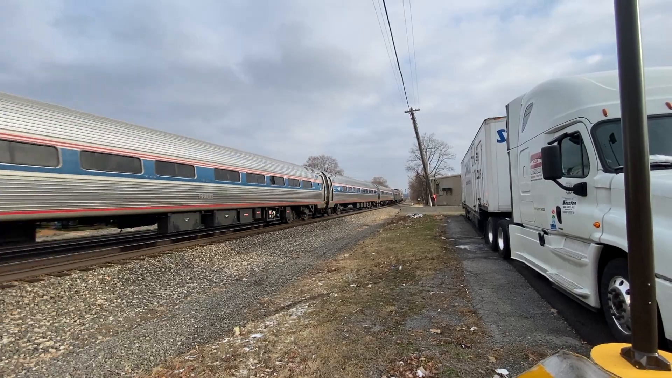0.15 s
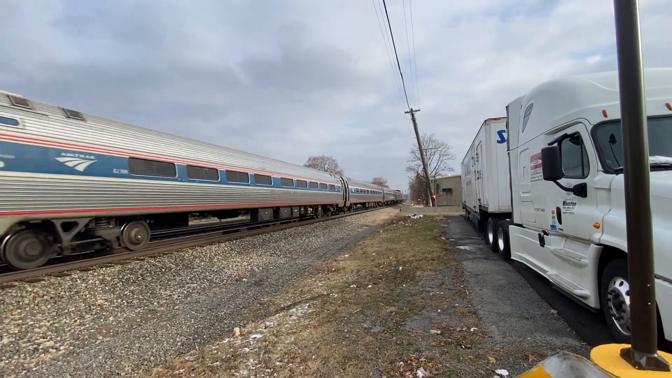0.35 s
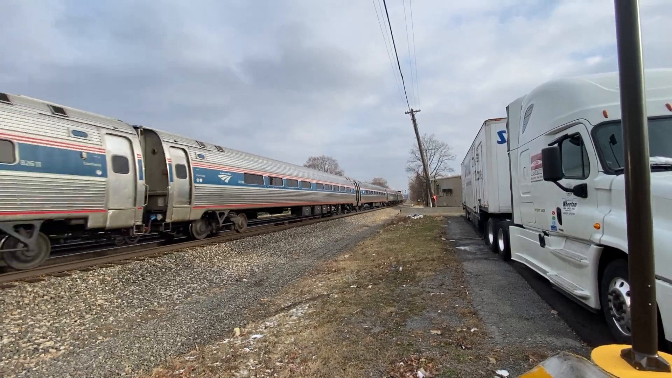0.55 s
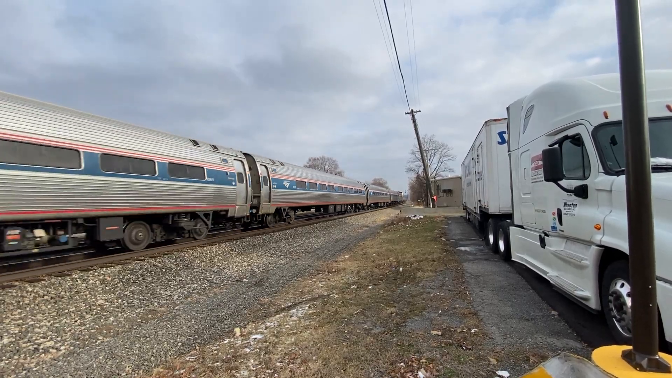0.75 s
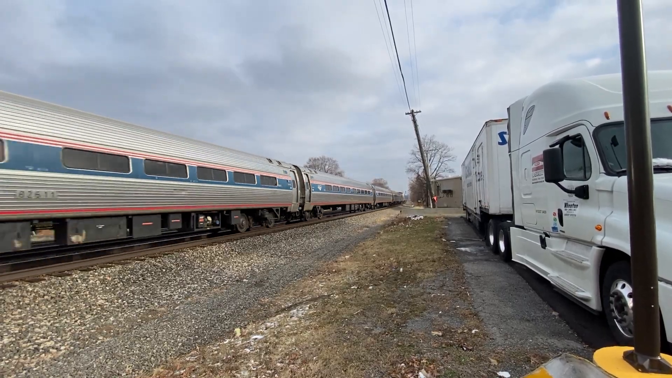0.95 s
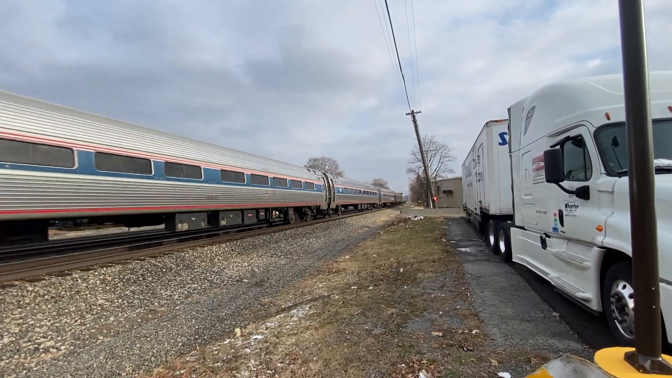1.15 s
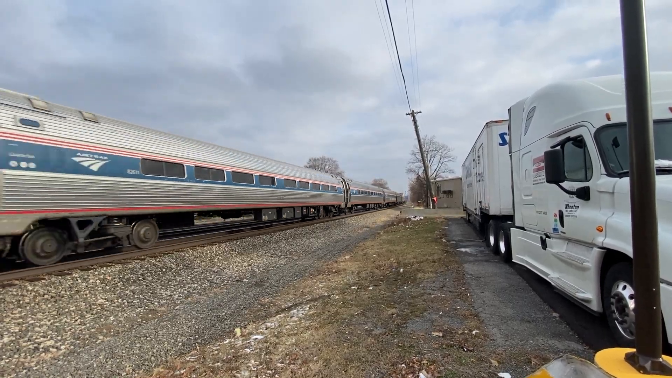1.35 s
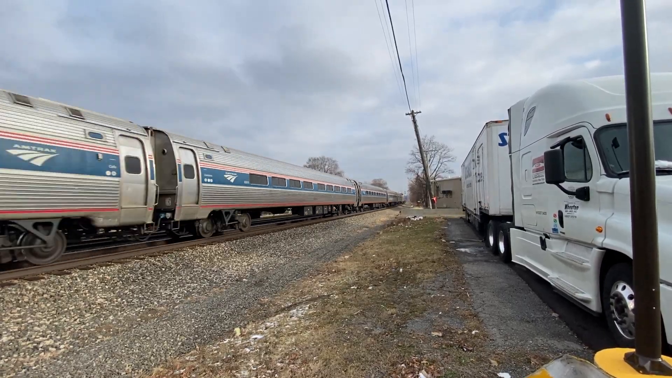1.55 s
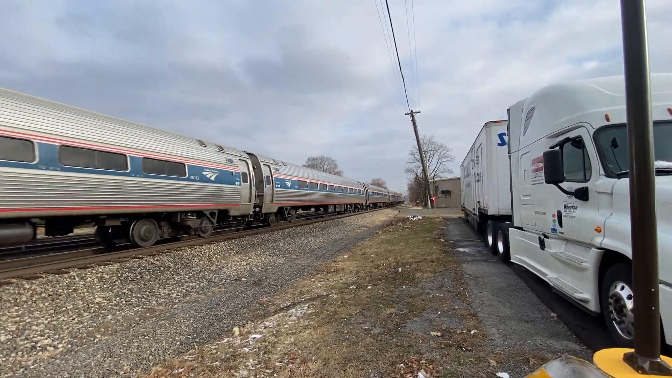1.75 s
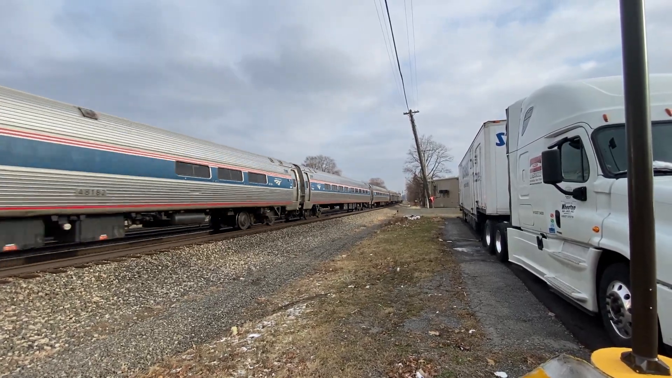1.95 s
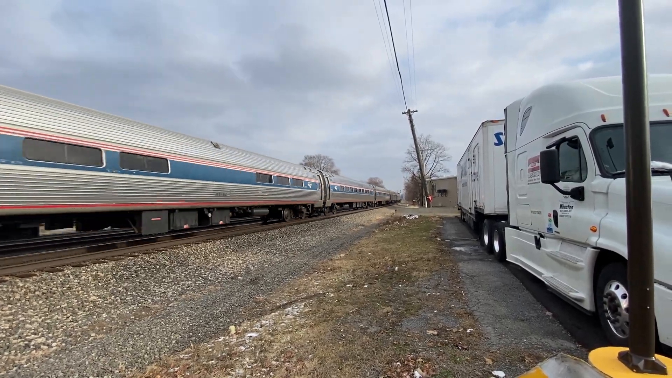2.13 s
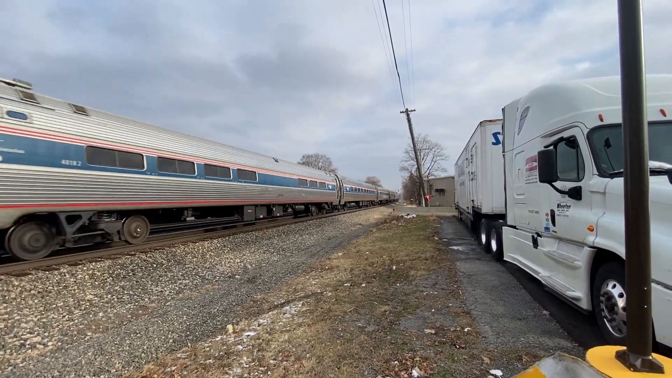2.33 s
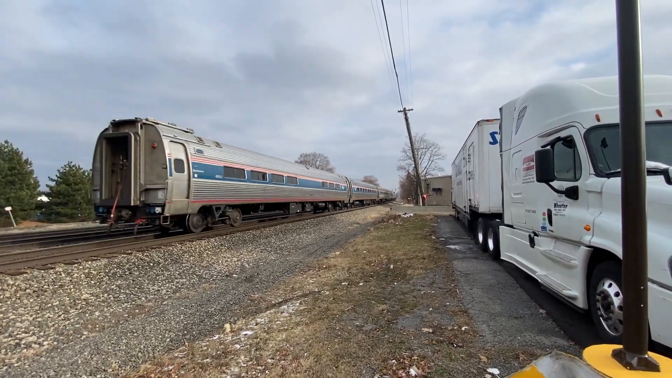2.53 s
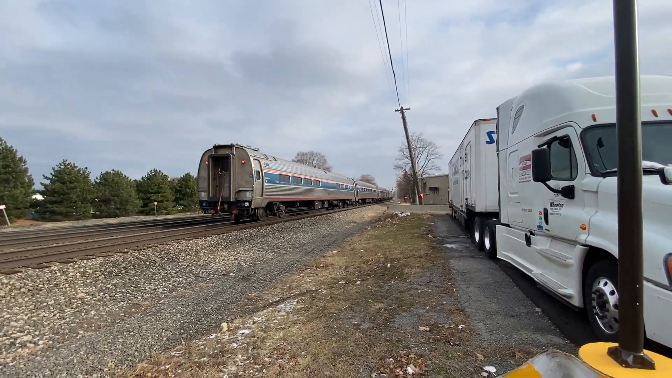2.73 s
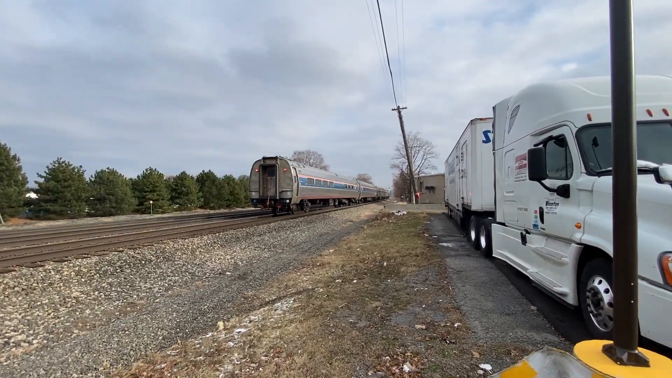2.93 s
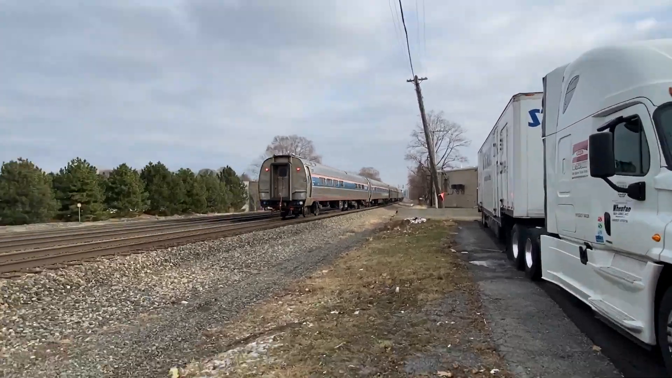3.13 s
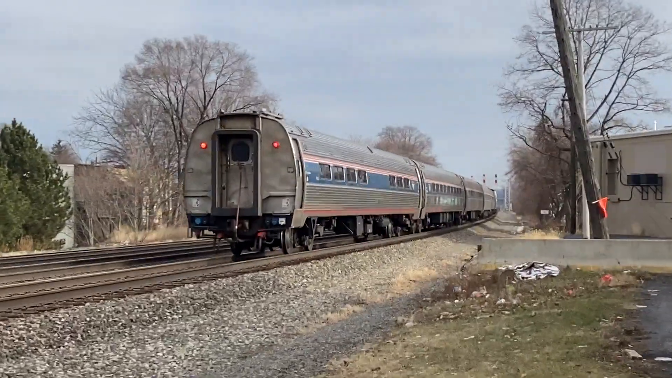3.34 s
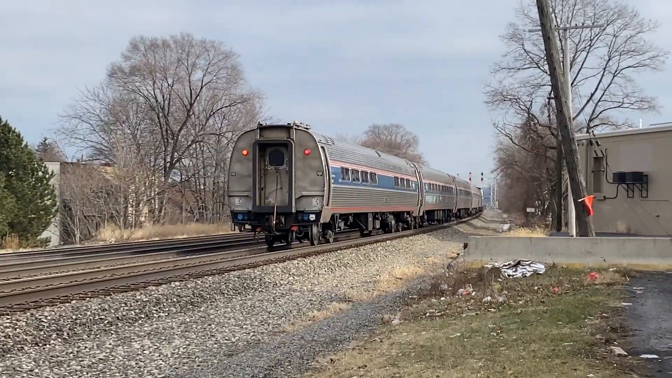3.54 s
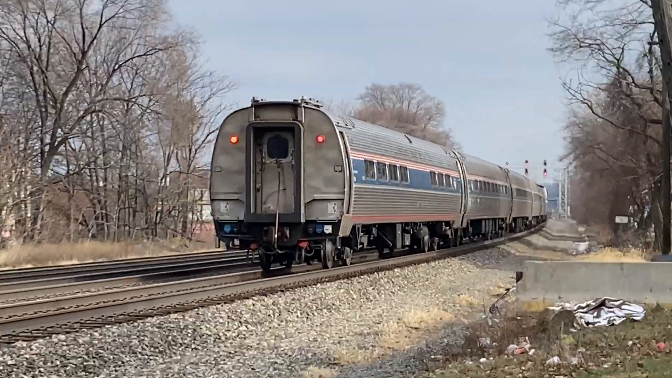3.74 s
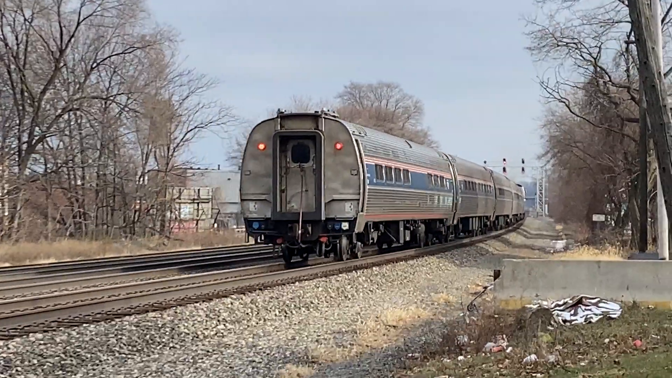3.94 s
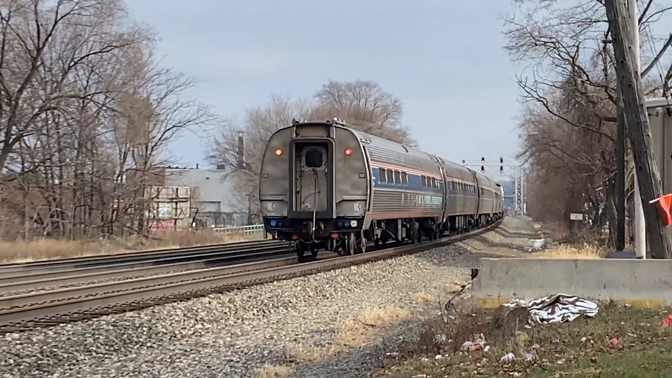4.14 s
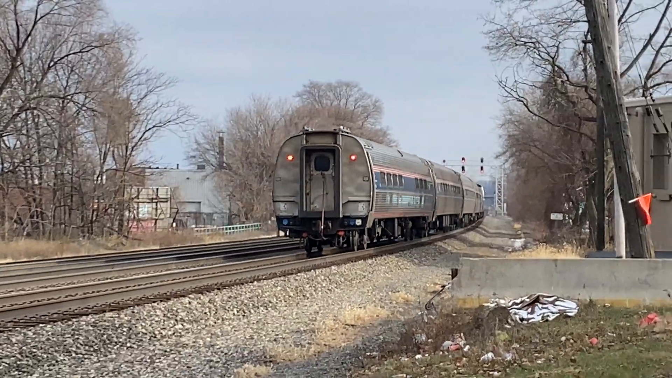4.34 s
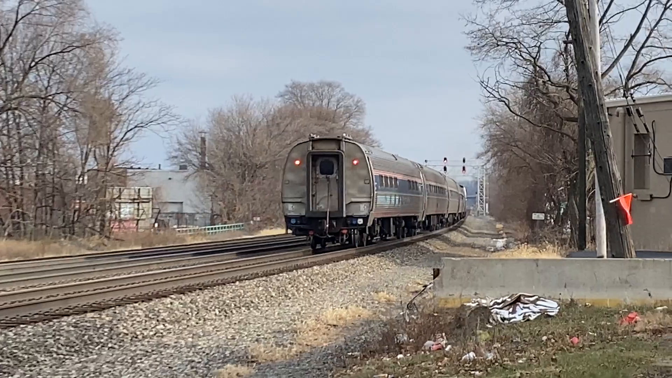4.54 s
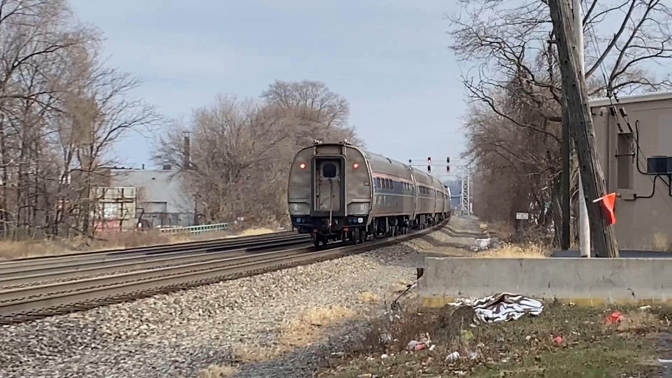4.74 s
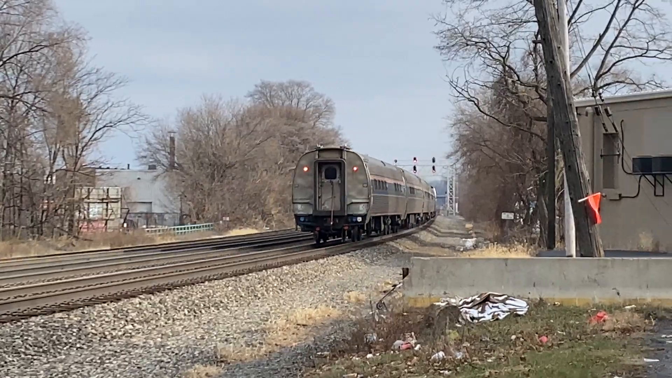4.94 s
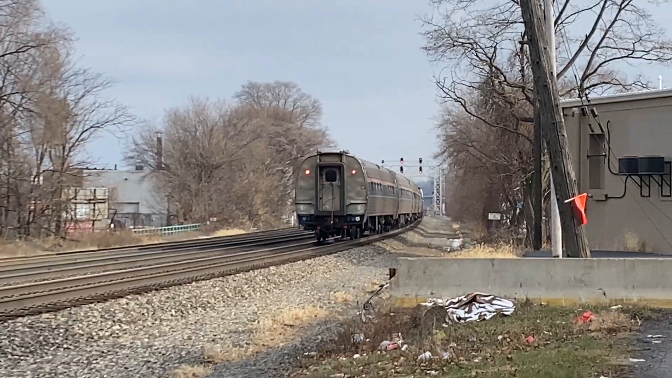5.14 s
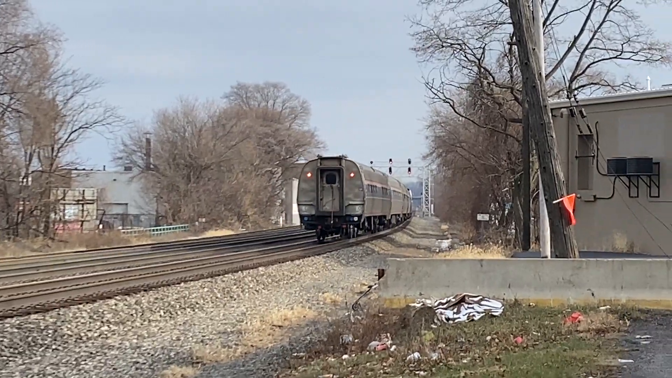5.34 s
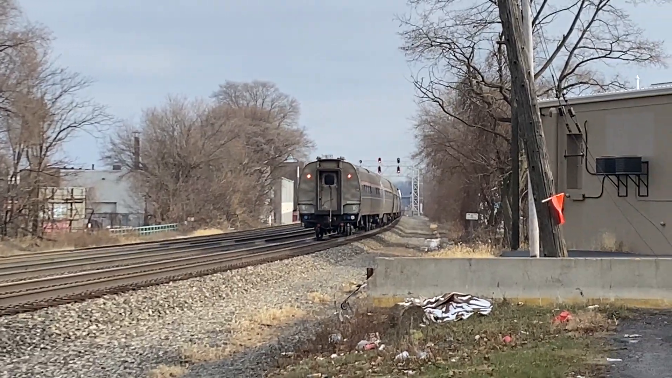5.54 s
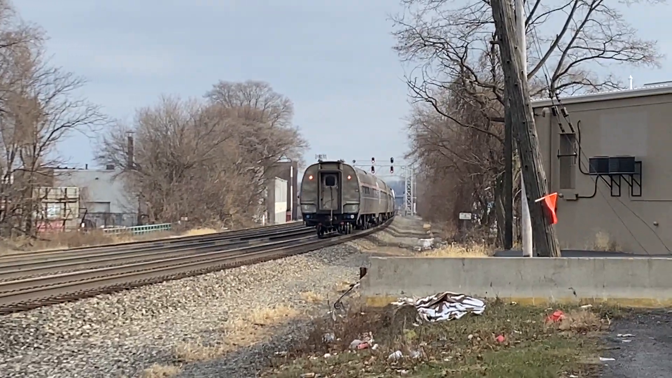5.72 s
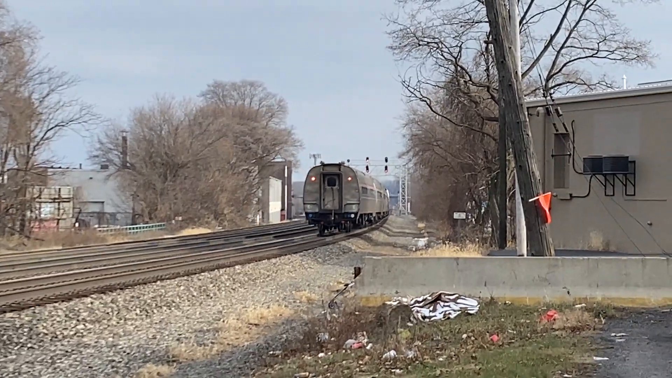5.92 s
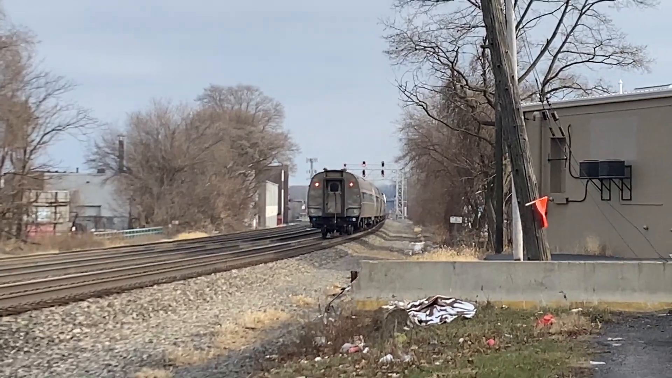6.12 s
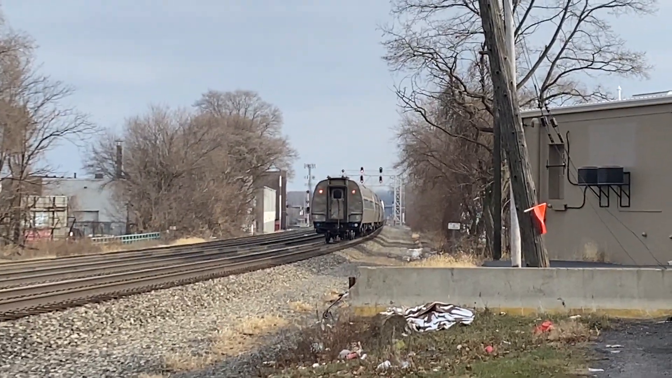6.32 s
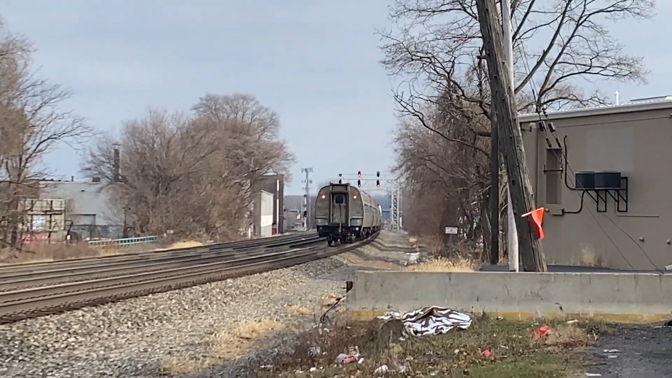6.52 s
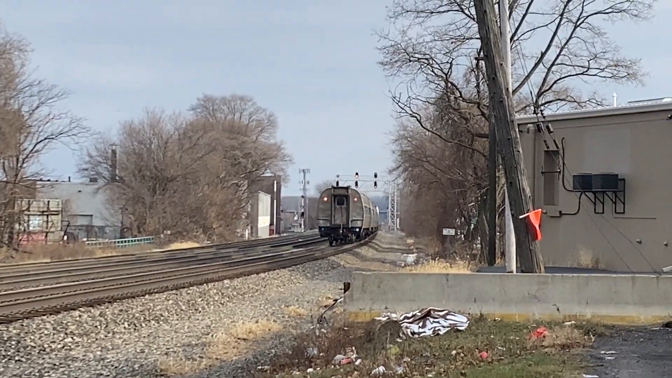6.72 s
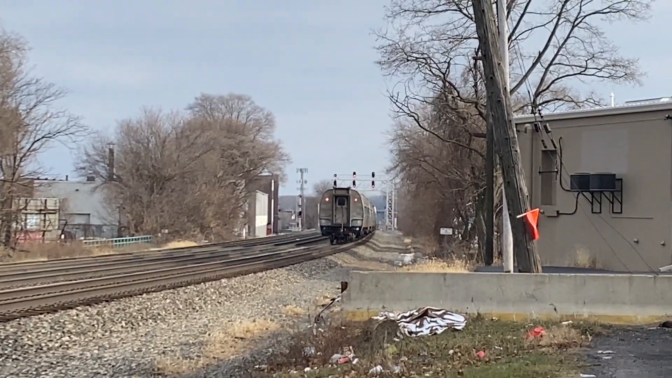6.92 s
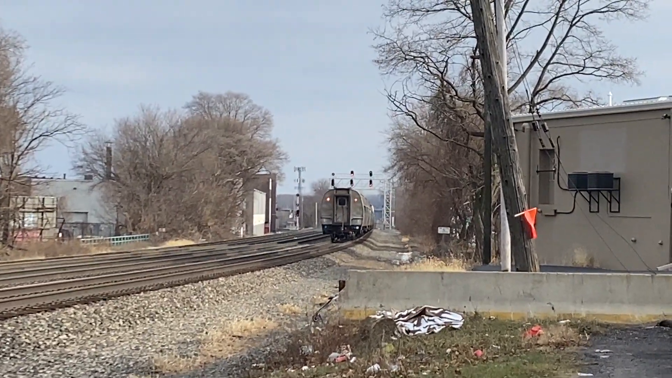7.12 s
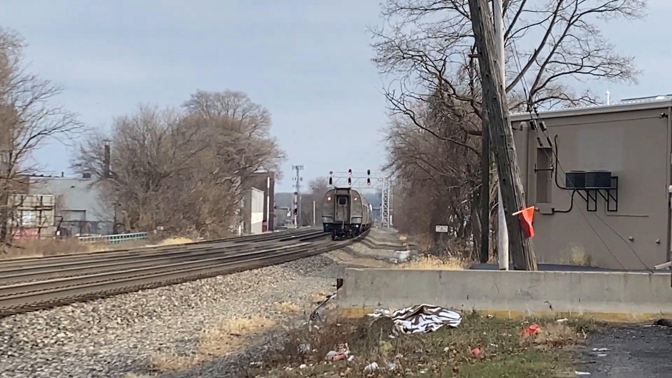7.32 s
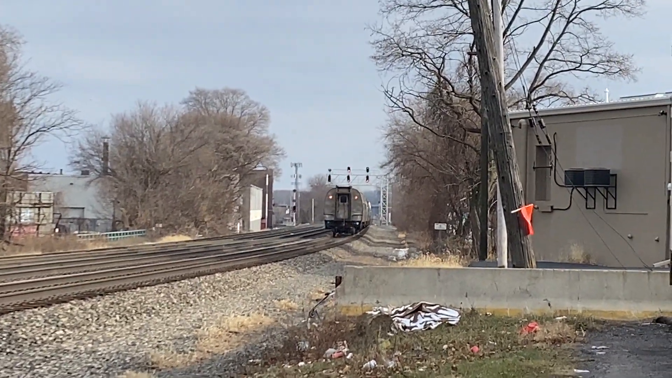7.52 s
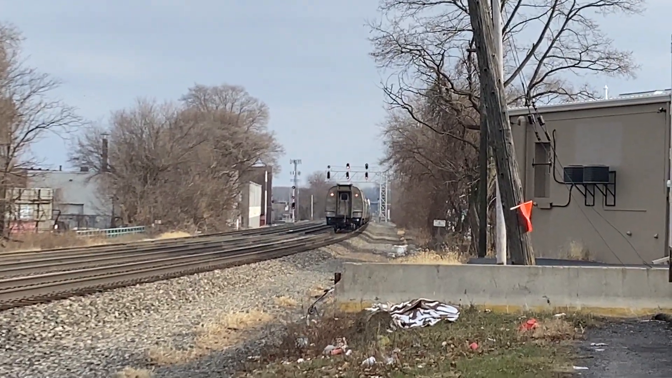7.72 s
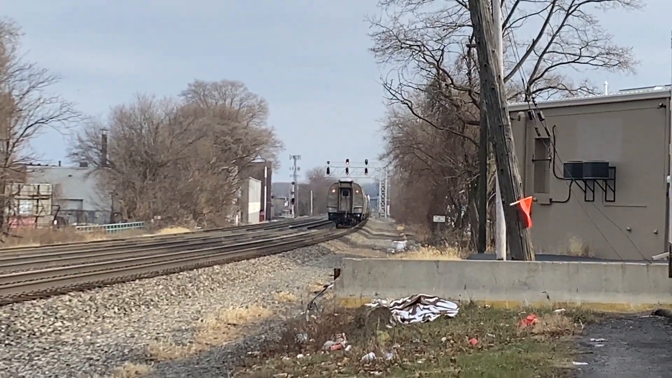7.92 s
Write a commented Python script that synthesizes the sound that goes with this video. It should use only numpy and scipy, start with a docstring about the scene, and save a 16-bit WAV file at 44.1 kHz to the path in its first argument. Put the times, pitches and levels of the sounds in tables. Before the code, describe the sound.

A passenger train rushes past close by with thumping, squealing wheels, then recedes down the track while a diesel truck idles.

```python
"""The last coaches of a passenger train rush past a few metres away, their wheels roaring on the rails.
Flat spots thump, loose steel clangs, and friction draws thin squeals and a falling screech from the wheels.
After about three seconds the train has passed and the wide stereo image narrows.
Flanges ring on as the roar recedes down the track, and a diesel truck,
idling beside the microphone throughout, is left throbbing."""
import sys
import numpy as np
from scipy import signal
from scipy.fft import rfft, irfft, next_fast_len
from scipy.io import wavfile
from scipy.ndimage import uniform_filter1d

SR = 44100
rng = np.random.default_rng(int(sys.argv[2]) if len(sys.argv) > 2 else 0)


def unload_wav(signal):
    """Save mono or channel-first audio to the path in sys.argv[1] as 16-bit WAV at rate SR, clipped to [-1, 1]."""
    wavfile.write(
        sys.argv[1],
        SR,
        np.round(np.clip(np.atleast_2d(signal).T, -1, 1) * 32767).astype(np.int16),
    )


N = 351477
TIME = np.arange(N) / SR
SPEED_M_S, SOUND_M_S, NEAREST_M = 25, 343, 9.3
TAIL_S = 2.62  # the last coach has passed
DIRECT_ONLY = np.c_[[1, 0]]  # sources have two rows: direct and scattered sound
# Passing groups of bogies. Each row: time abreast in seconds, relative swell in dB.
BOGIES = [(.26, 5), (1.36, 4.5), (2.15, 2.5)]


def gain_of(db):
    """Amplitude ratio of a level in decibels."""
    return 10 ** (np.asarray(db) / 20)


def unit_rms(x):
    """Normalisation to unit mean power."""
    return x / np.sqrt(np.mean(x ** 2) + 1e-20)


def along(rows, t):
    """Linear interpolation of each column of a curve at the times t."""
    s, *columns = np.transpose(rows)
    return [np.interp(t, s, c) for c in columns]


def across(rows, hz):
    """Interpolation of each column of a spectrum on a logarithmic frequency axis."""
    f, *columns = np.transpose(rows)
    return [np.interp(np.log(hz + 1), np.log(f + 1), c) for c in columns]


def bell(x, peak, width):
    """A Gaussian curve of height 1."""
    return np.exp(-((x - peak) / width) ** 2)


def flare(t, peak_s, rise_s, t60_s):
    """A Gaussian rise to height 1, then exponential decay."""
    decay = np.exp(-np.log(1000) * np.maximum(t - peak_s, 0) / t60_s)
    return bell(np.minimum(t, peak_s), peak_s, rise_s) * decay


def wander(rate_hz):
    """Random modulation: unit-power noise, low-passed at the given rate."""
    hz = np.fft.rfftfreq(4096, N / SR / 4096)
    slow = irfft(rfft(rng.standard_normal(4096)) / (1 + (hz / rate_hz) ** 4))
    return np.interp(TIME, np.linspace(0, N / SR, 4096), unit_rms(slow))


def resonance(hz, width_hz):
    """A noise-driven resonance: a narrow band about a steady or moving frequency."""
    pole = np.exp(-np.pi * width_hz * 1.5 / SR)
    noise = rng.standard_normal((2, N)) + 1j * rng.standard_normal((2, N))
    baseband = signal.lfilter([1], [1, -2 * pole, pole * pole], noise)
    carrier = np.exp(2j * np.pi * np.cumsum(hz * np.ones(N)) / SR)
    return unit_rms((baseband * carrier).real)


def modal_noise(modes, pitch_ratio=1):
    """Superposition of noise-driven modes, shifted together by resampling."""
    size = next_fast_len(N + N // 8)
    hz = np.fft.rfftfreq(size, 1 / SR)
    power = sum(gain_of(db) ** 2 * SR / (np.pi * width) / (1 + ((hz - f) / width) ** 2) ** 2
                for f, width, db in modes)
    noise = irfft(rfft(rng.standard_normal((2, size))) * np.sqrt(power), size)
    position = np.cumsum(pitch_ratio * np.ones(N))
    return np.array([np.interp(position, np.arange(size), row) for row in noise])


def tone(hz):
    """A unit-power sinusoid whose phase is the integral of its frequency."""
    return np.sqrt(2) * np.sin(2 * np.pi * np.cumsum(hz) / SR)


def doppler(hz, abreast_s):
    """Doppler effect: the frequency heard from a source riding past with the train."""
    past_m = SPEED_M_S * (TIME - abreast_s)
    return hz / (1 + SPEED_M_S / SOUND_M_S * past_m / np.hypot(past_m, NEAREST_M))


def diesel_idle(cycle_hz=8.08, beat_s=.108, waver_db=1.73, fade_db_per_s=.5):
    """Harmonics of the engine cycle beat roughly in step; their balance shifts as the train leaves."""
    # Engine orders. Each row: multiple, level beside the train in dB, level after it in dB, surge in dB.
    orders = [(6, -68, -42.5, 6), (10, -50, -55.5, -3), (12, -35, -41.5, 4), (14, -50, -52, 0),
              (15, -36, -38.5, -2), (16, -51.5, -48, 0)]
    # The ninth order. Each row: time in seconds, level in dB.
    ninth = [(0, -39.5), (2.3, -42), (3.2, -39.5), (3.7, -45), (4.1, -43), (5.0, -49), (5.35, -38.5),
             (5.8, -36.5), (6.05, -33), (6.4, -38.5), (6.8, -40), (7.97, -39)]
    cycles = np.cumsum(cycle_hz * (1 + 0.00033 * wander(2.4))) / SR - cycle_hz * beat_s
    gone = .5 + .5 * np.tanh(TIME - 2.2)
    surge = bell(TIME, 6.1, 0.15)
    fade_db = fade_db_per_s * np.maximum(TIME - TAIL_S, 0)
    levels = [(order, beside_db + (gone_db - beside_db) * gone + surge_db * surge - fade_db)
              for order, beside_db, gone_db, surge_db in orders]
    levels.append((9, *along(ninth, TIME)))
    out = np.zeros(N)
    for order, db in levels:
        turns = order * cycles + 0.49 * rng.random() + 0.068 * wander(7.5)
        out += gain_of(db + waver_db * wander(1.0)) * np.sin(2 * np.pi * turns)
    return np.sqrt(2) * out * DIRECT_ONLY


def coach_drone(hz=233.2, waver_hz=0.795, waver_db=1.5):
    """A low tone, slightly modulated in pitch and level, leaves with the last coach."""
    # The drone's envelope. Each row: time in seconds, level in dB.
    envelope = [(1.6, -50), (1.85, -32), (2.05, -45.5), (2.4, -32.5), (2.7, -40.5), (2.95, -37), (3.4, -48),
                (3.7, -45.5), (4.15, -41.5), (4.4, -42), (4.9, -57.5), (5.55, -48.5), (5.8, -67),
                (7.97, -67)]
    db, = along(envelope, TIME)
    hum = tone(hz + waver_hz * wander(7.2))
    return gain_of(db + waver_db * wander(9.8)) * hum * DIRECT_ONLY


def coach_boom(hz=89, width_hz=15):
    """The coach bodies boom in one low resonance."""
    # The boom's envelope. Each row: time in seconds, level in dB.
    envelope = [(0, -35.5), (2.2, -36), (3.6, -40.5), (4.2, -35), (5.1, -35), (6.2, -41), (7.97, -43)]
    db, = along(envelope, TIME)
    return gain_of(db) * resonance(hz, width_hz)


def flange_squeaks(waver_hz=9, stutter_db=3.0):
    """Friction excites a single mode as a flange catches briefly."""
    # Squeaks. Each row: peak time in seconds, length in seconds, pitch in Hz, level in dB.
    squeaks = [(.55, 0.046, 3370, -47), (0.768, 0.04, 6120, -47), (1.0, .025, 7650, -53),
               (2.505, .03, 5050, -55), (3.16, 0.11, 4920, -58.5), (3.275, 0.055, 4925, -54)]
    out = np.zeros(N)
    for s, length, hz, db in squeaks:
        envelope = gain_of(db) / (1 + ((TIME - s) / length) ** 2) ** 2
        out += envelope * tone(hz + waver_hz * wander(83))
    return out * gain_of(stutter_db * wander(50)) * DIRECT_ONLY


def wheel_squeals(width_hz=55, halo_hz=300, halo_db=-8, stutter_db=0.5):
    """Gripping wheels squeal in thin resonances that slide down by the Doppler effect."""
    # Squeals. Each row: time abreast in seconds, pitch in Hz, time of tightest grip in seconds,
    # length in seconds, level in dB.
    grips = [(0.34, 10000, 0.28, 0.13, -58), (1.061, 11730, 1.02, 0.34, -43),
             (1.06, 11730, 1.065, 0.068, -32), (0.73, 12650, 1.65, 0.24, -45),
             (2.087, 11790, 1.83, 0.2, -37.5), (2.084, 11830, 2.092, 0.073, -34.5),
             (2.088, 11850, 2.205, 0.12, -41)]
    out = np.zeros((2, N))
    for abreast_s, hz, grip_s, length, db in grips:
        heard_hz = doppler(hz, abreast_s)
        squeal = resonance(heard_hz, width_hz) + gain_of(halo_db) * resonance(heard_hz, halo_hz)
        out += gain_of(db - stutter_db * wander(40)) * bell(TIME, grip_s, length) * squeal
    return out


def wheel_singing(hz=3206.3, waver_hz=5, stutter_db=0.8):
    """Friction sets one wheel mode singing and stirs its neighbours; damping lets them ring out."""
    # Catches. Each row: peak time in seconds, rise in seconds, 60 dB decay time in seconds, level in dB.
    catches = [(2.1, 0.19, .65, -41), (3.29, 0.037, .4, -44), (3.396, 0.04, 0.2, -33.5),
               (3.47, 0.031, 0.22, -40), (3.655, 0.084, 0.53, -37), (3.755, 0.023, .3, -43.5),
               (3.87, 0.048, 0.4, -46), (4.06, 0.066, 0.62, -42), (4.16, .04, 0.31, -56),
               (4.32, .025, 0.32, -54), (4.455, .03, .3, -54)]
    # Wheel modes. Each row: frequency in Hz, width in Hz, relative level in dB.
    modes = [(3196, 21, -4.5), (3250, 22, -14), (2620, 110, -9.5), (3600, 380, -11), (3950, 25, -15),
             (4960, 18, -20)]
    power = sum((gain_of(db) * flare(TIME, s, rise_s, t60_s)) ** 2 for s, rise_s, t60_s, db in catches)
    pure = tone(hz + waver_hz * wander(36.5)) * DIRECT_ONLY
    return np.sqrt(power) * gain_of(stutter_db * wander(35)) * (0.69 * pure + 0.4 * modal_noise(modes))


def flange_rubs(level_db=-1, reach_hz=500, shudder_db=1.2):
    """Forced vibration: a flange rubbing the rail stirs the modes near the centre of its broad scrape."""
    # Rubs. Each row: peak time in seconds, length in seconds, centre in Hz, glide in Hz per second,
    # relative level in dB.
    rubs = [(1.596, .15, 3400, -1000, -41), (1.81, 0.06, 3960, 0, -38), (2.118, 0.44, 3450, -0.5, -38),
            (2.566, 0.071, 3845, 0, -40), (2.795, .08, 3800, 0, -39.5), (3.05, 0.199, 3600, -1, -50),
            (3.432, 0.29, 3420, 0.5, -48.5), (3.399, 0.041, 3332, 0, -44.5), (3.636, 0.048, 3300, 0, -49.5)]
    # The wheel modes that the flange stirs, in Hz.
    modes_hz = [2980, 3206, 3311, 3440, 3590, 3741, 3854, 3967, 4081, 4200]
    powers = np.array([(gain_of(db) * bell(TIME, s, length)) ** 2 + 1e-20
                       for s, length, _, _, db in rubs])
    centres = [hz + glide * np.clip(TIME - s, -2 * length, 2 * length)
               for s, length, hz, glide, _ in rubs]
    centre_hz = np.average(centres, axis=0, weights=powers)
    weights = np.array([bell(hz, centre_hz, reach_hz) for hz in modes_hz])
    weights /= np.linalg.norm(weights, axis=0)
    ring = sum(w * resonance(hz, width_hz=28) for w, hz in zip(weights, modes_hz))
    envelope = np.sqrt(powers.sum(0)) * gain_of(level_db + shudder_db * wander(20))
    return envelope * (0.85 * ring + 0.52 * resonance(centre_hz, width_hz=750))


def wheel_screech(reach_hz=425, rough_db=2.5):
    """Friction drives inharmonic modes of a passing wheel; they fall together as the emphasis sinks."""
    # The slide. Each row: time in seconds, base pitch in Hz, strongest frequency in Hz, level in dB.
    slide = [(1.17, 3830, 4500, -55), (1.25, 3754, 4310, -36.5), (1.4, 3570, 3885, -36.5),
             (1.52, 3373, 3630, -35.5), (1.7, 3300, 3400, -35), (1.78, 3260, 3780, -36.5),
             (1.9, 3240, 3690, -40), (2.2, 3187, 3330, -65)]
    # Screeching modes. Each row: ratio to the base pitch, relative level in dB.
    modes = [(.81, -2), (.94, -3), (1.0, 1.5), (1.04, 0.5), (1.11, -5), (1.165, -4.5), (1.24, 4), (1.29, 3)]
    base_hz, centre_hz, db = along(slide, TIME)
    weights = np.array([gain_of(mode_db) / (1 + ((base_hz * ratio - centre_hz) / reach_hz) ** 2)
                        for ratio, mode_db in modes])
    weights /= np.linalg.norm(weights, axis=0)
    ring = sum(w * resonance(base_hz * ratio, width_hz=72) for w, (ratio, _) in zip(weights, modes))
    return gain_of(db + rough_db * wander(70)) * (0.77 * ring + .66 * resonance(centre_hz, width_hz=620))


def steel_clangs(rise_s=.003):
    """Damped free vibration: each jolt sets one loose steel part ringing."""
    # Jolts. Each row: time in seconds, pitch in Hz, 60 dB decay time in seconds, level in dB.
    jolts = [(.13, 1992, 0.31, -38), (.22, 2370, .25, -37), (.317, 1949, .35, -33), (.424, 1389, .35, -29),
             (0.767, 1280, .3, -28), (2.12, 1520, .4, -37), (2.26, 1500, .4, -39)]
    rings = sum(gain_of(db) * flare(TIME, s, rise_s, t60_s) * np.sin(2 * np.pi * hz * TIME)
                for s, hz, t60_s, db in jolts)
    return np.sqrt(2) * rings * DIRECT_ONLY


def bogie_ringing(length_s=0.36):
    """The wheel modes of each group of bogies swell and fall in pitch by the Doppler effect."""
    # Rolling wheels' modes. Each row: frequency when abreast in Hz, width in Hz, level in dB.
    modes = [(1485, 20, -40.5), (1572, 18, -43.5), (2230, 29, -49.5), (2410, 29, -55), (2696, 21, -49),
             (2790, 35, -47.5), (3630, 110, -45.5)]
    return sum(bell(TIME, s, length_s) * modal_noise(modes, doppler(1, s)) for s, _ in BOGIES)


def rail_ringing(drift=0.00396, waver_db=2.0):
    """Forced vibration: the rails ring in drifting modes as strongly as the wheels grind on them."""
    # Rail modes. Each row: frequency in Hz, width in Hz, level relative to the grind in dB.
    modes = [(444, 30, -8.5), (742, 41, -6), (990, 19, -12.5), (1378, 45, -14.5), (1737, 20, -18),
             (1956, 12, -20), (1990, 13, -17.5), (2616, 43, -19.5)]
    t = TIME[::256]
    _, _, grind_db, _ = rolling_levels(t)
    envelope = gain_of(np.interp(TIME, t, grind_db) + waver_db * wander(3.5))
    return envelope * modal_noise(modes, 1 + drift * wander(2.86))


def flat_spots(fall_db_per_decade=36):
    """Periodic impact: one knock a wheel turn, delayed and weakened by distance, as (s, dB, Hz)."""
    # Flat wheels. Each row: time abreast in seconds, seconds per turn, relative peak in dB, pitch in Hz.
    wheels = [(.314, .102, -5.5, 620), (1.836, .103, -11.5, 698)]
    knocks = []
    for abreast_s, turn_s, db, hz in wheels:
        for since_s in np.arange(-2, 9) * turn_s:
            distance_m = np.hypot(NEAREST_M, SPEED_M_S * since_s)
            delay_s = (distance_m - NEAREST_M) / SOUND_M_S
            loss_db = fall_db_per_decade * np.log10(distance_m / NEAREST_M)
            knocks.append((abreast_s + since_s + delay_s, db - loss_db, hz))
    return knocks


def thumps(level_db=-2, bounce_s=0.01, bounce_db=-6.5, clatter_per_s=45, crack_db=-17, crack_s=0.0025):
    """Impacts ring wheel and track, crack if near and bounce twice; loose gear clatters in between."""
    # Modes of wheel and track. Each row: frequency in Hz, width in Hz, relative level in dB.
    modes = [(456, 134, -3), (628, 157, 3.5), (787, 89, -6), (1350, 240, -8.5), (2040, 200, -20.5)]
    # Single knocks of wheels on the track, many on the flat wheels' beat.
    # Each row: start in seconds, relative peak in dB, pitch in Hz.
    single_knocks = [(.179, -12, 600), (.224, -9, 590), (.437, -12, 540), (.532, -12, 560),
                     (.582, -10, 593), (.626, -15, 700), (.844, -8, 648), (.867, -14, 600),
                     (1.03, -15, 700), (1.061, -14.5, 640), (1.103, -15, 640), (1.153, -12.5, 660),
                     (1.196, -15, 640), (1.26, -12, 600), (1.36, -14, 630), (1.399, -12, 630),
                     (1.409, -11.5, 660), (1.429, -13.5, 590), (1.522, -10.5, 520), (1.573, -11.5, 600),
                     (1.621, -12.5, 630), (1.737, -12, 634), (1.897, -9.5, 540), (2.05, -13, 700),
                     (2.067, -14, 620), (2.173, -14, 601), (6.661, -29, 796), (7.224, -27, 790)]
    mode_hz, width, mode_db = np.transpose(modes)[:, :, None]
    main_hz = modes[1][0]
    gaps, sizes = rng.random((300, 2)).T
    clatter_s = np.cumsum(-np.log(gaps)) / clatter_per_s  # Poisson arrivals
    clatter = [(s, -35 + 9 * size + np.interp(s, [2.1, 3.6], [0, -16]), main_hz)
               for s, size in zip(clatter_s, sizes) if s < 4]
    knocks = [(s, level_db + db, hz) for s, db, hz in flat_spots() + single_knocks]
    bounces = [(s + bounce_s * (k + rng.uniform(-0.351, 0.197)), db + k * bounce_db, hz)
               for s, db, hz in knocks for k in (1, 2)]
    out, age = np.zeros((2, N)), TIME[:2000]
    envelopes = gain_of(mode_db) * width * age * np.exp(-np.pi * width * age)
    lowpass = signal.butter(2, 2800, fs=SR)
    for s, db, hz in knocks + bounces + clatter:
        detune = 1 + 0.067 * rng.uniform(-1.12, 1, (2, *mode_hz.shape))
        pitch = mode_hz * hz / main_hz * detune
        ring = (envelopes * np.sin(2 * np.pi * (pitch * age + rng.random(pitch.shape)))).sum(1)
        ring /= abs(ring).max(1, keepdims=True)
        noise = unit_rms(signal.lfilter(*lowpass, rng.standard_normal(ring.shape)))
        crack = noise * np.exp(-age / crack_s) * (s < TAIL_S)
        out[:, round(s * SR):][:, :len(age)] += gain_of(db) * (ring + gain_of(crack_db) * crack)
    return out


def fizz_level(t, rise_s=0.028, t60_s=0.75, flicker_db=2.0):
    """Amplitude modulation of the top treble, in dB: a faint fizz flickers and now and then flares."""
    # The fizz's envelope. Each row: time in seconds, level in dB.
    envelope = [(0, -51), (.6, -55.5), (1.05, -50.5), (2.4, -53), (3.1, -64), (4.5, -63), (5.8, -60.5),
                (6.3, -68), (7.97, -71.5)]
    # Flares. Each row: peak time in seconds, height above the envelope in dB.
    flares = [(3.81, 5), (4.22, 14.5), (4.46, 6), (4.83, 7), (5.0, 5), (5.4, 2), (5.78, 3), (6.69, 5)]
    db, = along(envelope, t)
    flare_db = sum(up_db * flare(t, s, rise_s, t60_s) for s, up_db in flares)
    return db + flare_db + flicker_db * np.interp(t, TIME, wander(7.3))


def rolling_levels(t, radiating_m=21.3, swell_s=0.56, far_s=6.3, fade_db_per_s=1.17):
    """Attenuation with distance, in dB: each band swells as bogies pass, then sinks to a far roar."""
    # Rumble, roar, grind and hiss. Each row: level alongside in dB, fall in dB per tenfold distance,
    # far-off level in dB, factor on the bogie swell.
    bands = [(-40, 28, -45.5, 1.33), (-33, 42, -45, 1.29), (-39.5, 43, -48, 1.5), (-50.5, 43, -79, 1.4)]
    near_db, fall_db, far_db, share = np.transpose(bands)[:, :, None]
    distance_m = np.hypot(radiating_m, SPEED_M_S * np.maximum(t - TAIL_S, 0))
    swell_db = sum(db * bell(t, s, swell_s) for s, db in BOGIES)
    train = gain_of(near_db + share * swell_db - fall_db * np.log10(distance_m / radiating_m))
    far_roar = gain_of(far_db - fade_db_per_s * np.maximum(t - far_s, 0))
    return 20 * np.log10(np.hypot(train, far_roar))


def mottle(shape, frames, bins):
    """A random field, correlated over neighbouring time frames and frequency bins."""
    smooth = uniform_filter1d(rng.standard_normal(shape), size=frames, axis=0)
    return unit_rms(uniform_filter1d(smooth, size=bins, axis=1))


def rolling_roar(near_patch_db=2.0, far_patch_db=1.0, flicker_db=0.73, sway_db=0.33):
    """Roughness excitation: steel on steel gives broad noise that dulls and evens out with distance."""
    # Spectra. Each row: frequency in Hz, then relative level in dB alongside, just past and far off.
    spectra = [(20, -24, -16, -17), (37.8, -17, -23, -10), (54, -2.5, -1.5, 1), (80, -4, -2, 11.5),
               (147, -8.5, -2, -1), (235, -3.5, -3.5, -15), (289, -12.5, -14, -1), (461, -1, -10.5, -17),
               (520, 3.5, -5, -2.5), (767, -2.5, -6.5, -10), (1047, -6.5, -9.5, -21),
               (1115, -12, -12.5, -47), (1360, -5.5, -10, -21.5), (1600, -16, -20, -14),
               (2060, -15.5, -22, -10), (2340, -23.5, -28.5, -14.5), (2590, -18.5, -19, -30.5),
               (3010, -19, -24.5, -23), (3310, -23, -22, -20), (4280, -26, -30, -24.5),
               (4600, -25.5, -34, -26), (7430, -31, -36, -66), (8850, -35.5, -42, -105),
               (11350, -23, -30, -55), (14230, -25.5, -31.5, -4), (16500, -46, -37, -38)]
    # The retreat. Each row: time in seconds, stage (0 alongside, 1 just past, 2 far off).
    retreat = [(2.1, 0), (2.8, 0.98), (4.0, 1.066), (5.2, 1.166)]
    # Rumble, roar, grind, hiss and fizz. Each row: lower edge in Hz, upper edge in Hz.
    edges = [(150, 260), (330, 1100), (1100, 2900), (5100, 7800), (13000, 15900)]
    hz, t = np.fft.rfftfreq(1024, 1 / SR), np.arange(N // 256 + 5) * 256 / SR
    stage, = along(retreat, t)
    field_db = sum(np.outer(np.maximum(1 - abs(stage - k), 0), db)
                   for k, db in enumerate(across(spectra, hz)))
    levels = [db + sway_db * np.interp(t, TIME, wander(1.3)) for db in rolling_levels(t)]
    levels.append(fizz_level(t))
    centres_hz = np.sqrt(np.prod(edges, axis=1))
    shares = across(np.c_[centres_hz, np.eye(len(edges))], hz)
    power = gain_of(field_db) ** 2
    for (lo, hi), level_db, share in zip(edges, levels, shares):  # draw each band towards its level
        band_db = 10 * np.log10(power[:, (hz >= lo) & (hz < hi)].sum(1))
        field_db += np.outer(level_db - band_db, share)
    patch_db = np.interp(stage, [0, 1], [near_patch_db, far_patch_db])[:, None]
    field_db += patch_db * mottle(power.shape, frames=22, bins=3)
    field_db += flicker_db * mottle(power.shape, frames=4, bins=90)
    noise = rng.standard_normal((2, *power.shape)) + 1j * rng.standard_normal((2, *power.shape))
    frames = noise * gain_of(field_db) * np.sqrt(3 / 2)
    return signal.istft(frames.transpose(0, 2, 1), nperseg=1024, noverlap=768)[1][:, :N]


def microphone_pair(sound, image):
    """Partial coherence: the left hears direct sound, the right a phase-shifted mix with scattered."""
    size = next_fast_len(N + 2048)
    lead, coherence, balance_db = across(image, np.fft.rfftfreq(size, 1 / SR))
    direct, scattered = rfft(sound, size)
    right = (coherence * direct + np.sqrt(1 - coherence ** 2) * scattered) * np.exp(-1j * lead)
    tilt = gain_of(balance_db)
    return irfft(np.array([direct * tilt, right]) * np.sqrt(2 / (1 + tilt ** 2)), size)[:, :N]


def scene(narrow_at_s=3.23, crossfade_s=0.057):
    """Superposition of train and truck, heard first wide, then narrow and a little brighter."""
    # The two stereo images. Each row: frequency in Hz, phase lead of the left in radians,
    # coherence from 0 to 1, level of left over right in dB.
    wide = [(60, -0.1, 0.97, -3.4), (130, -0.1, 0.94, -3.4), (250, 0.7, 0.68, -4.2), (400, 1.9, 0.88, 1.5),
            (800, 2.2, 0.77, 3.2), (1300, 2.9, 0.71, -2.1), (1800, 4.8, 0.49, -1.9),
            (2300, 6.8, 0.58, -1.6), (3100, 9.9, 0.5, 4.9), (4200, 12.7, 0.25, 4.7),
            (5500, 14.6, 0.07, 5.2), (7200, 18.8, 0.49, 3.7), (8200, 21.9, 0.69, 1.9),
            (9300, 15.7, 0.9, 0.3), (10500, 12.7, 0.91, 0.1), (11800, 11.8, 0.93, -0.4),
            (13300, 9.4, 0.99, -0.0), (15000, 6.3, 0.96, 0.0)]
    narrow = [(60, -0.1, 1.0, -1.1), (250, -0.1, 0.99, -1.8), (700, 0.2, 0.88, -1.9),
              (1500, 0.5, 0.75, -1.5), (2200, 0.1, 0.97, 0.1), (3200, 0.4, 0.99, -0.2),
              (7200, -0.0, 1.0, 0.0), (8400, -2.8, 0.72, 0.4), (9300, -3.2, 0.97, 0.0),
              (10500, -5.6, 0.77, 0.1), (11800, -7.0, 0.77, 0.0), (13300, -9.5, 0.92, 0.0),
              (15200, -12.2, 0.91, -0.0)]
    sound = (rolling_roar() + coach_boom() + rail_ringing() + bogie_ringing() + thumps() + steel_clangs()
             + flange_rubs() + wheel_screech() + flange_squeaks() + wheel_singing() + wheel_squeals()
             + coach_drone() + diesel_idle())
    treble = signal.sosfilt(signal.butter(1, [3200, 8000], "bandpass", fs=SR, output="sos"), sound)
    brighter = sound + 0.4 * treble
    narrowed = np.clip((TIME - narrow_at_s) / crossfade_s + .5, 0, 1)
    return (1 - narrowed) * microphone_pair(sound, wide) + narrowed * microphone_pair(brighter, narrow)


def record(dry, bass_hz=40, edge_hz=15850):
    """Band limiting: the microphone's bass roll-off, then a steep treble cut."""
    thinned = signal.sosfilt(signal.butter(5, bass_hz, "highpass", fs=SR, output="sos"), dry)
    lowpass = signal.firwin(511, edge_hz, window=("kaiser", 9), fs=SR)
    return signal.oaconvolve(thinned, lowpass[None], "same")


dry = scene()
out = record(dry)
unload_wav(out)
```